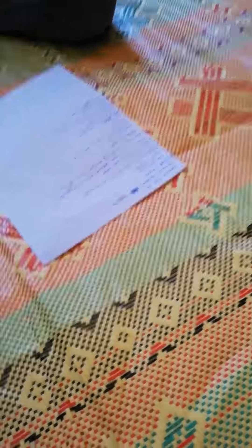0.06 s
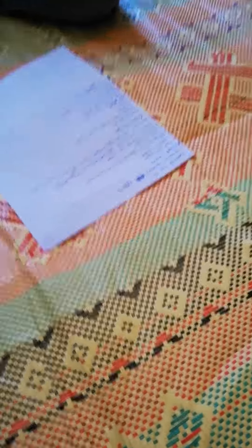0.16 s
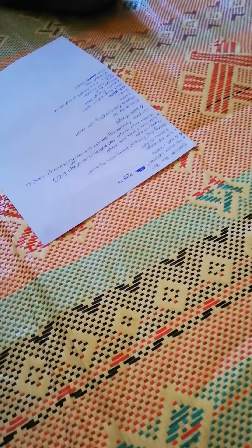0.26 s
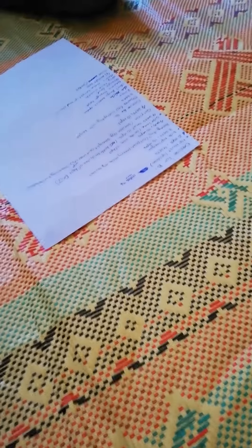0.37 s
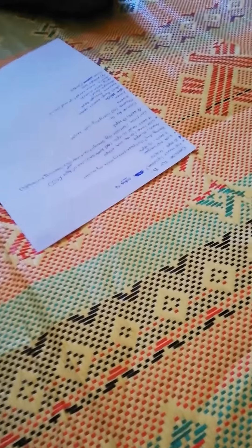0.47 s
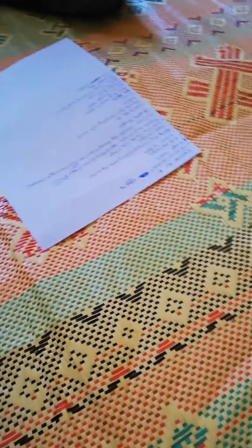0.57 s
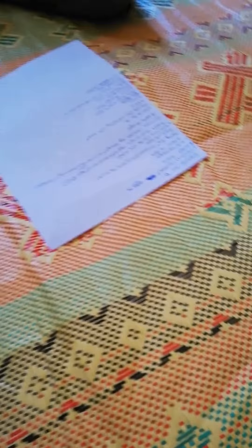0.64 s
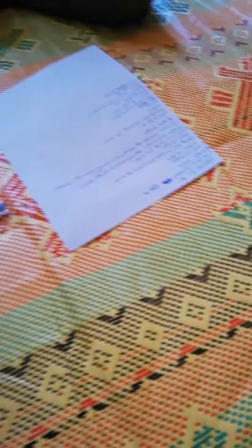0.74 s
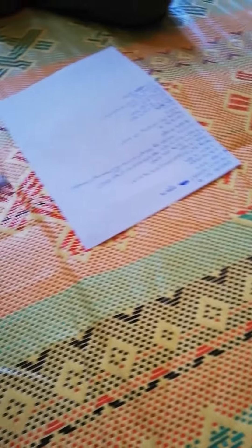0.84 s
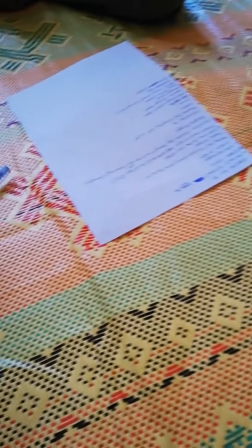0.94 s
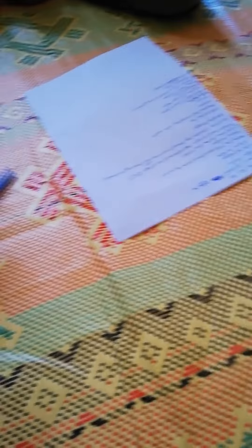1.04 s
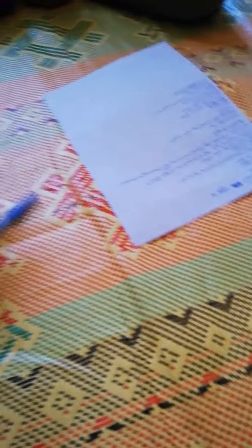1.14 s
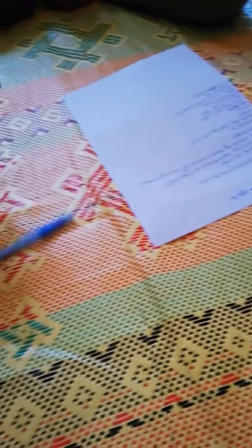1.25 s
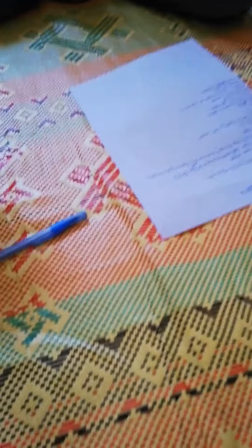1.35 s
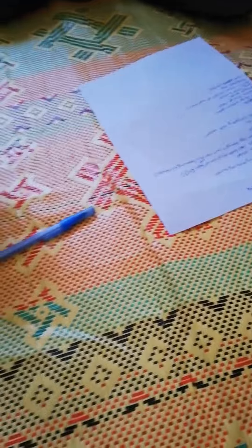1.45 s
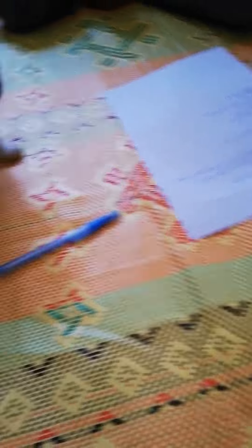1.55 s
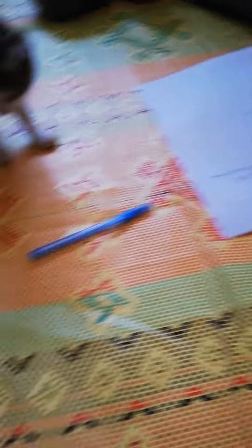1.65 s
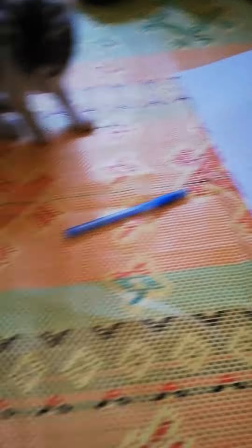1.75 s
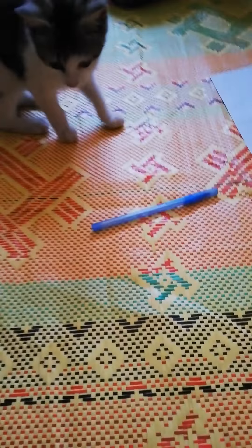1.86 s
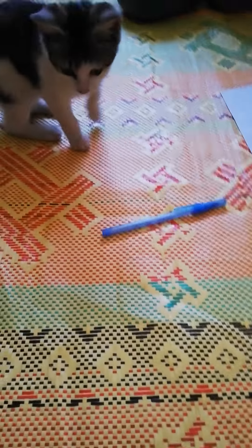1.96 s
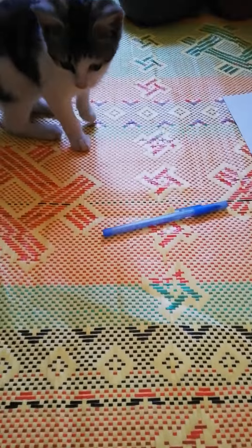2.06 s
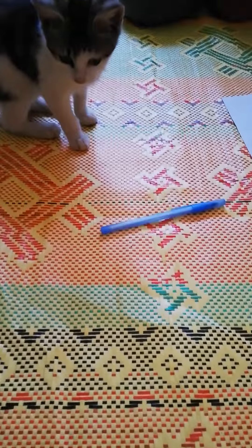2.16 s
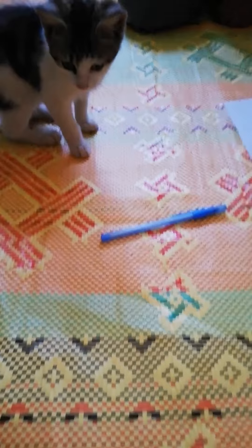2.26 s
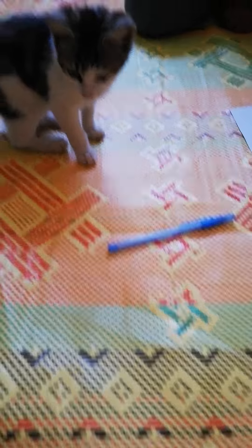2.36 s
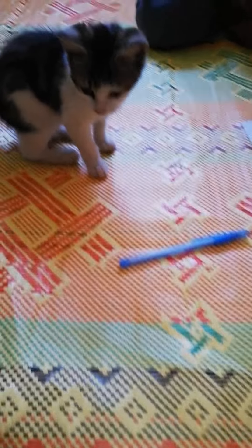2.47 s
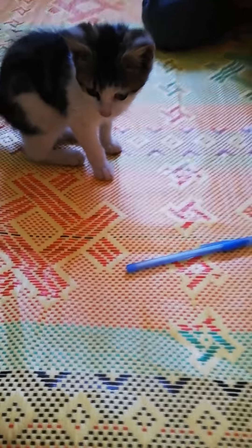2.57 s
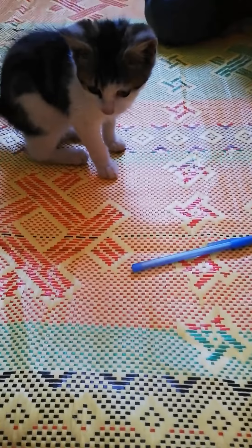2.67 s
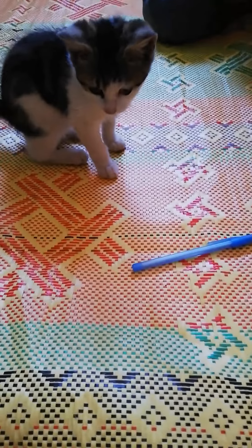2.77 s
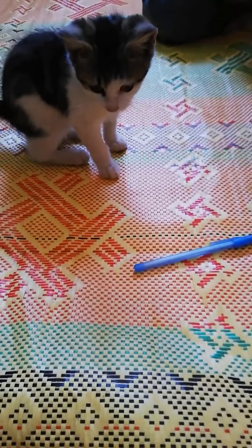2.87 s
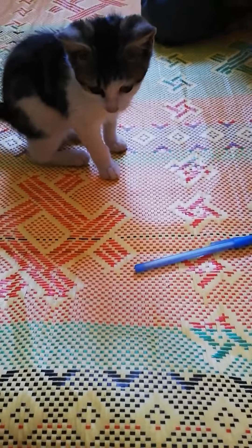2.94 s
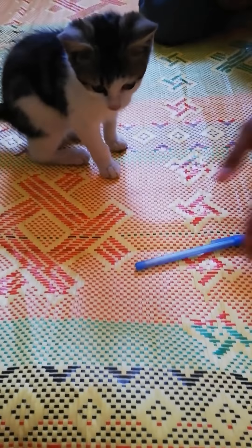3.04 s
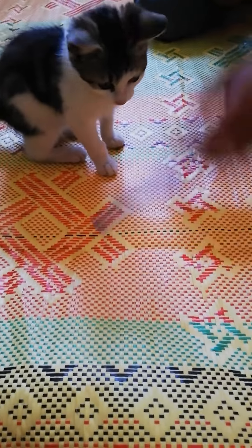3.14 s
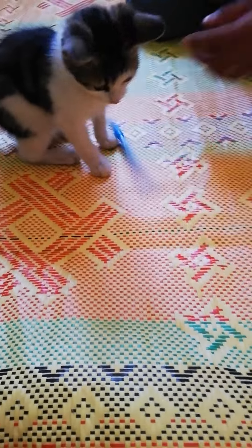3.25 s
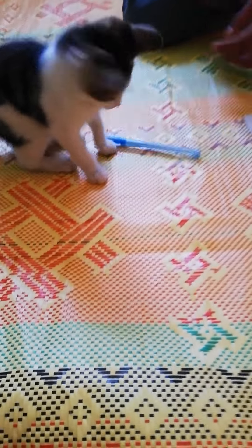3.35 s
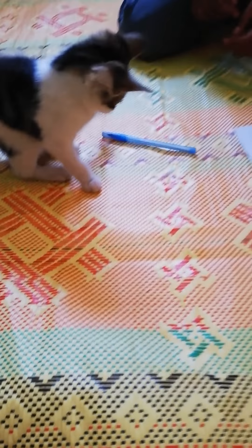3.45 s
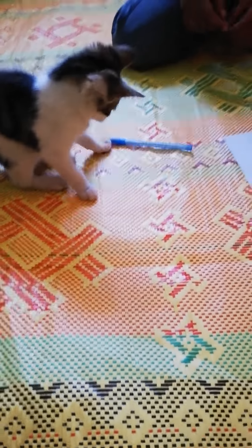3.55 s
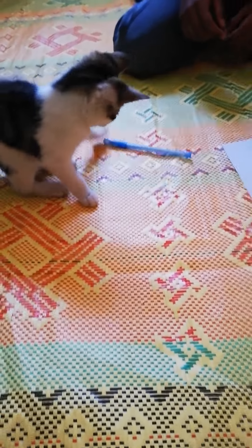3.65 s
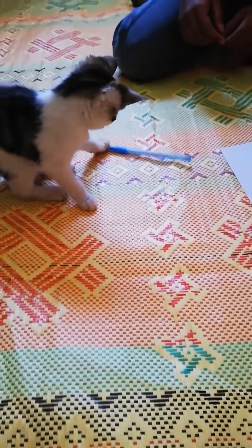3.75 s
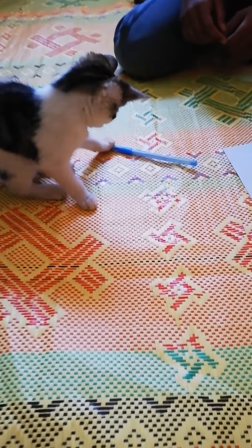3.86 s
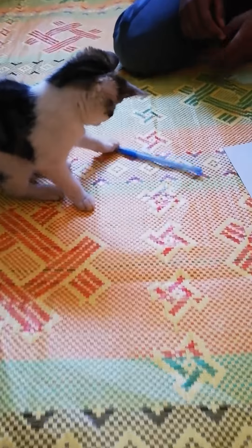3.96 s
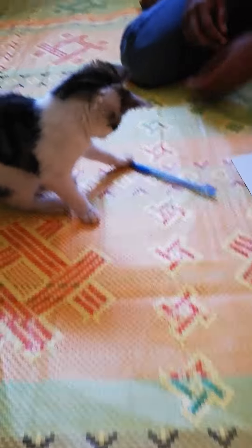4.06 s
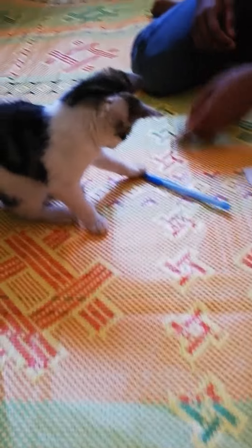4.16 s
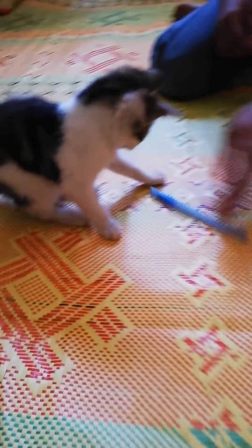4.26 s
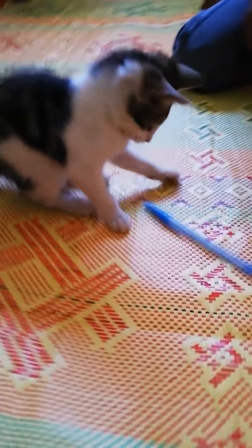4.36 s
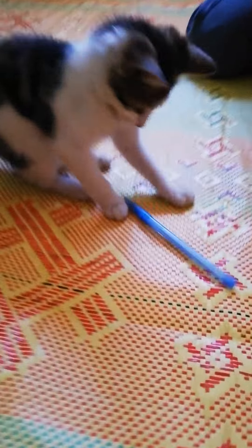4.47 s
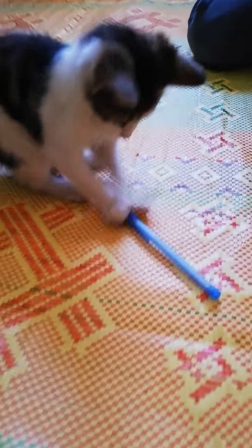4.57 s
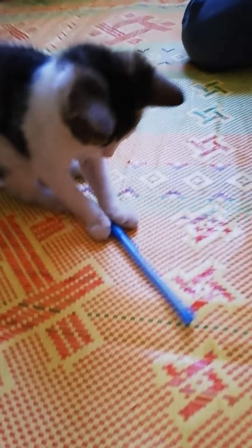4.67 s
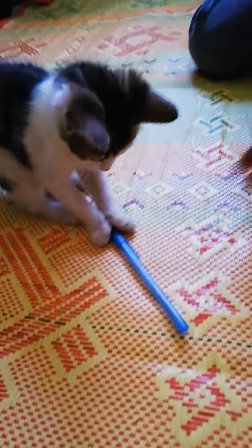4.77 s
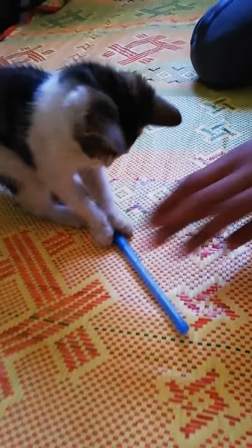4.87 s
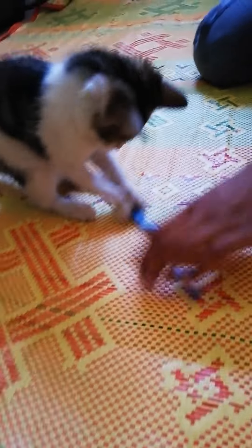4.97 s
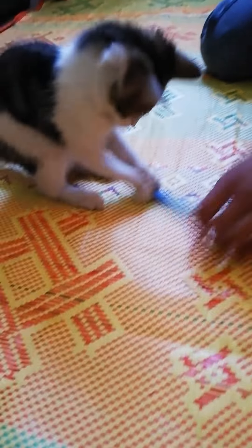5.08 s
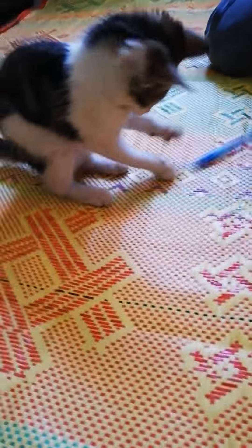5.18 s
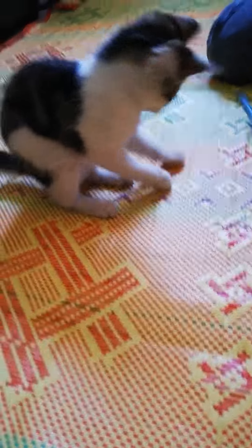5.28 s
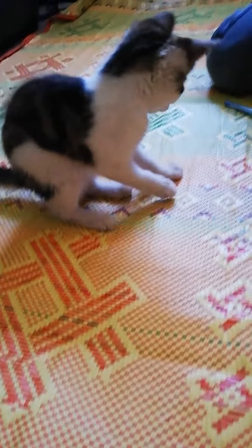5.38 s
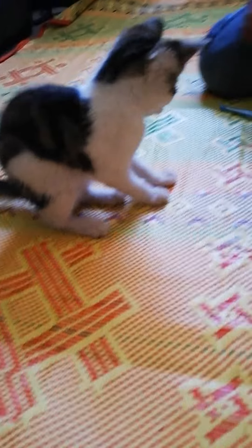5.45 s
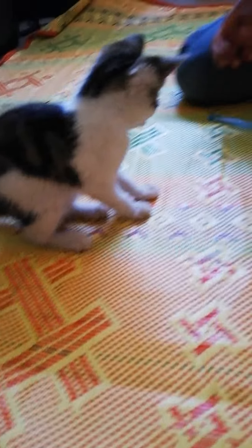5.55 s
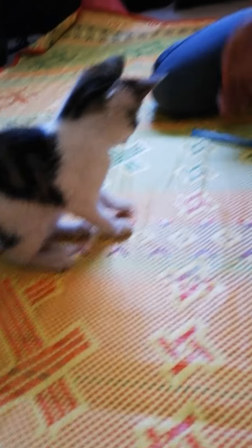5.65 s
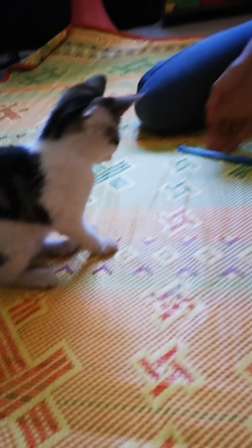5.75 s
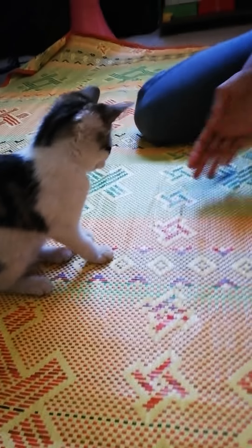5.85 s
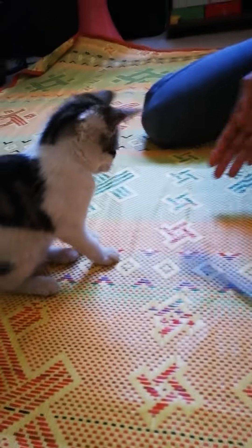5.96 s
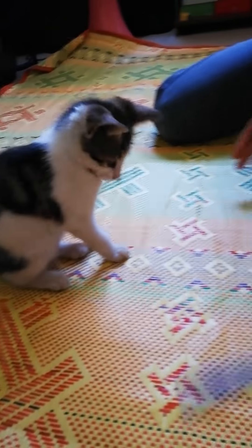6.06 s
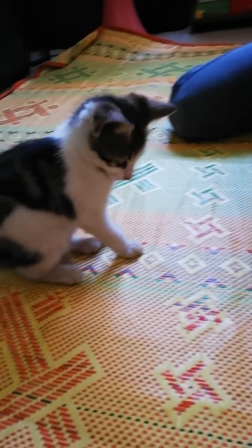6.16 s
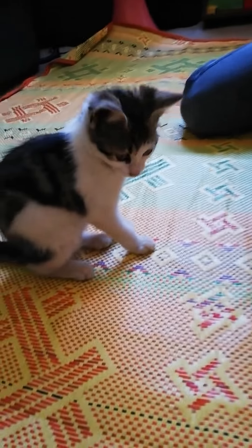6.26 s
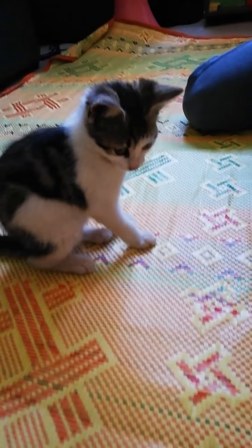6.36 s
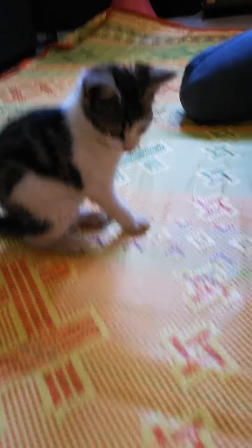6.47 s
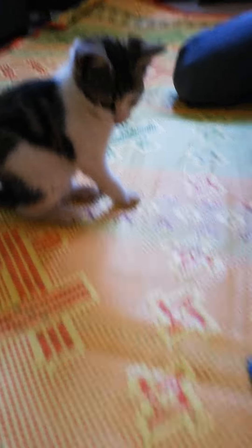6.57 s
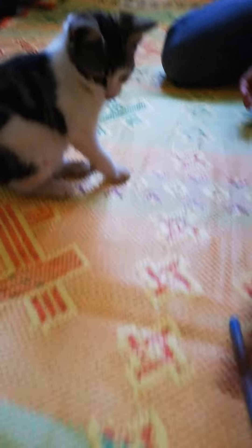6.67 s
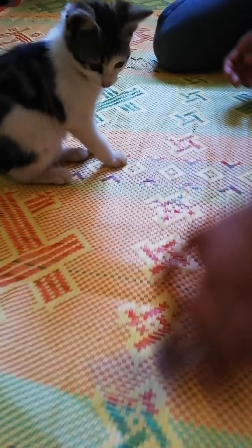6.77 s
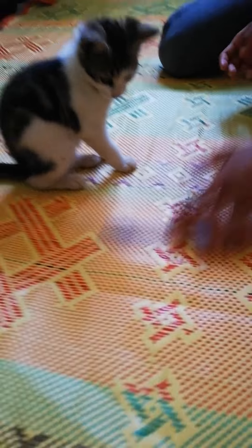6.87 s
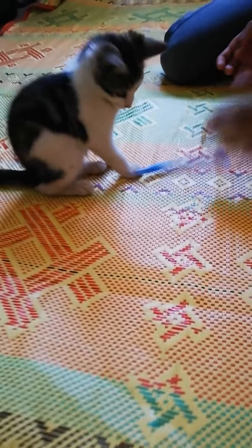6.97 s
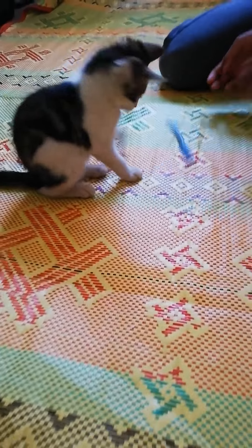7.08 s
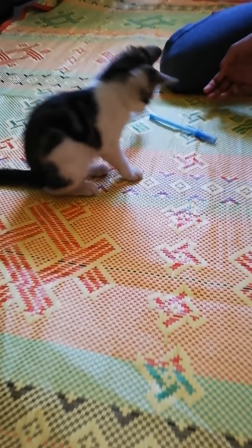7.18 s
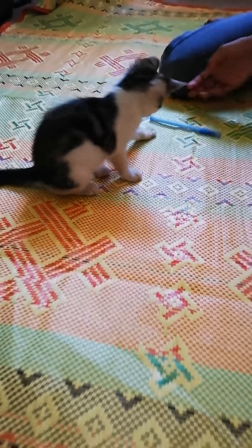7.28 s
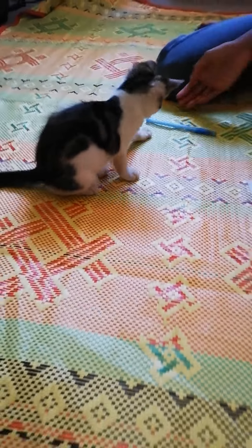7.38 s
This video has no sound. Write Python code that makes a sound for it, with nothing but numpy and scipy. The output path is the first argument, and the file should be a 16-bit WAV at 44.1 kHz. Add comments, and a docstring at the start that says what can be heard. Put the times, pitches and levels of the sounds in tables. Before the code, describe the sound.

A quiet small room, heard close to a woven plastic mat: soft low rumble, faint hiss and weak wavering hums. A barely audible brush at 0.1 s, then crisp claw or pen ticks from 0.75 to 1.0 s, towards the left, and another tight cluster at 1.25 s. A soft scrape follows at 1.5 to 1.9 s. Near quiet, with one tick at 2.55 s. At 3.1 to 3.35 s rough scuffs and clicks, then the loudest sharp snaps at 3.8 to 4.05 s, to the right. A scuff at 4.27 s, a strong scratchy swipe and snap around 4.45 s, thinner rustling, then a duller scrape at 5.05 s and clicks at 5.2 to 5.3 s. A tick at 5.8 s, knocky crackles at 6.0 to 6.3 s, a bright rough rustling burst at 6.7 to 7.0 s, and a final snap at 7.37 s with a faint brush.

```python
"""Friction and snaps on a woven mat

A kitten and a hand push a plastic pen about on a woven plastic floor mat, close to a two-microphone phone.
Friction is a train of random slips: filtered by the strands it hisses and crackles, by the mat's modes it thuds.
Claws and pen snap over single strands: each snap is a filtered tick over a damped sine, the knock of the mat.
Shaped noise gives the small room's rumble and faint hiss, narrow bands of noise its four low drones.
Level and delay between the ports place the play; a resonance near 10 kHz colours each port."""
import sys
import numpy as np
from scipy import signal
from scipy.fft import next_fast_len
from scipy.io import wavfile
from scipy.ndimage import uniform_filter1d

SR = 44100
rng = np.random.default_rng(int(sys.argv[2]) if len(sys.argv) > 2 else 0)


def generate_wav(signal):
    """Clip the signal to [-1, 1] and save it as 16-bit WAV at the path in sys.argv[1]."""
    frames = np.transpose(np.atleast_2d(signal))
    scaled = np.clip(frames, -1, 1) * 32767
    pcm = np.round(scaled).astype(np.int16)
    wavfile.write(sys.argv[1], SR, pcm)


N = 327222  # length in samples

# Spectrum of the room noise ahead of the ports. Each row: frequency in Hz, relative level in dB.
AIR_SPECTRUM = [(25, -2), (50, -3.5), (130, -6), (270, -13), (400, -24), (1000, -20.5), (2500, -29.5),
                (7000, -38), (16000, -45)]
# Correlation of the room noise between the ports. Each row: frequency in Hz, correlation from 0 to 1.
AIR_LIKENESS = [(150, 0.99), (290, 0.78), (600, 0.0077)]
# Four low drones that swell and fade. Each row: time in seconds, then level in dB of each, lowest first.
DRONE_LEVELS = [(0, -68, -65, -58, -66.5), (1.9, -68, -60.5, -58.5, -73.5), (4.3, -72, -67, -73, -83),
                (4.6, -55, -62, -66, -81), (6.3, -54, -62, -77, -92), (6.6, -78, -62.5, -80, -83)]
# The drones' resonances, each applied twice. Each row: centre in Hz, width of one pass in Hz.
DRONE_BANDS = [(59, 6.1), (91.5, 3), (102.5, 7.6), (324, 6.8)]
# Frequency response of a flicked strand. Each row: frequency in Hz, relative gain in dB.
STRAND_RESPONSE = [(1200, -36.5), (2200, -5.5), (4000, -1.5), (6500, -2.5), (13000, -2.5), (16000, -10.5)]
# Modes of the mat. Each row: frequency in Hz, width in Hz, relative level in dB.
MAT_MODES = [(394, 274, -4.5), (800, 605, 0.5), (1073, 484, 3.5), (1590, 420, 0.5), (2780, 2030, -5.5)]
# Place of the play. Each row: time in seconds, left minus right level in dB (treble; the bass gets a share).
PLACE_PATH = [(0, -1.5), (.8, 8.5), (1.8, 2), (2.6, -2.5), (3.3, 9.5), (3.75, -8.5), (4.06, -8.5),
              (4.22, 6.5), (4.4, -4), (5.05, 6.5), (5.3, 10.5), (6, 7), (6.28, 0.5), (6.75, 7.5),
              (7.36, -5.5)]
# Strokes of paw, hand or pen along the weave. Each row: start of full strength in seconds, rise in seconds,
# hold in seconds, fall in seconds, strand hiss in dB, mat body against the hiss in dB.
STROKE_EVENTS = [(0.109, 0.4, 0.013, 0.072, -49, -8), (0.823, 0.091, .01, 0.29, -51, -6),
                 (1.278, 0.14, 0.027, 0.035, -52, 4.5), (1.544, 0.076, 0.35, 0.23, -44, -8.5),
                 (2.304, 0.67, 0.31, 0.71, -56, -5), (3.128, 0.0033, 0.42, 0.54, -52.5, -6.5),
                 (4.22, 0.0055, 0.17, 0.057, -46.5, -7.5), (4.272, 0.07, .01, 0.3, -40, -6.5),
                 (4.44, 0.078, 0.055, 0.045, -33, -7), (4.548, .05, 0.28, 0.054, -52.5, -6),
                 (5.056, 0.032, 0.086, 0.055, -38, -0.5), (5.37, 0.84, 0.013, 0.053, -49.5, -2),
                 (5.393, .2, 0.39, 0.14, -59.5, -10), (5.836, 0.19, 0.0079, 0.063, -49, -9.5),
                 (5.997, 0.0018, .005, 0.21, -41, -3.5), (6.032, 0.016, 0.28, 0.077, -54, 5),
                 (6.78, 0.084, 0.11, 0.16, -36.5, -5), (6.971, 0.049, 0.13, 0.14, -44, -2),
                 (7.42, 0.49, 0.034, 0.074, -55, -2)]
# Rubs that make one patch of the mat sing, its resonance applied twice. Each row: middle in seconds,
# length in seconds, level in dB, pitch in Hz, width of one pass in Hz.
RUB_EVENTS = [(1.488, 0.019, -43.5, 1590, 1100), (4.461, 0.059, -42, 2550, 1900),
              (4.864, 0.37, -62, 1840, 940), (5.098, 0.13, -50, 257, 322), (6.723, 0.071, -46, 1020, 1400),
              (6.795, 0.094, -43, 1220, 600)]
# Short rough scuffs over a few strands. Each row: time of full strength in seconds, length scale in seconds,
# strand crackle in dB, mat body against the crackle in dB.
SCUFF_EVENTS = [(0.85, 0.0057, -31.5, -18), (1.53, 0.072, -50.5, 13.5), (3.157, 0.046, -38, -5.5),
                (3.242, 0.016, -30, -10.5), (3.318, 0.011, -41, -0.5), (3.885, 0.02, -29.5, -6.5),
                (4.274, 0.021, -28.5, -12), (5.046, 0.0064, -36.5, 1), (5.061, 0.014, -34, 3),
                (5.241, 0.02, -38, -10.5), (5.998, 0.0069, -36.5, 2.5), (6.039, 0.02, -43, 3.5),
                (6.069, 0.036, -41, 0.5), (6.173, 0.015, -40, -3.5), (6.818, 0.015, -32, -32),
                (6.849, 0.014, -33, 2), (6.887, 0.034, -32, -2.5), (6.935, 0.022, -27, -15)]
# Snaps of claw or pen over a strand. Each row: start in seconds, level in dB, mat knock against the snap in dB.
SNAP_EVENTS = [(0.7477, -28, -25), (0.8277, -31, -22), (0.84, -22, -34), (0.896, -25, -12),
               (0.911, -28, -32), (.9212, -21.5, -17), (0.9998, -23.5, -17.5), (1.036, -34, -8),
               (1.2425, -29, -5), (1.2546, -24.5, -20), (1.2577, -35, -28), (1.2645, -24, -7.5),
               (1.2707, -21.5, -8), (2.546, -24, -27.5), (3.131, -35, 6), (3.2457, -27, -38),
               (3.311, -34, 0.5), (3.3268, -24, -12), (3.3368, -19, -15.5), (3.811, -40.5, 5.5),
               (3.843, -34, 9), (3.8476, -25.5, -1), (3.85, -28, -4), (3.872, -24, -10), (3.8878, -18, -17),
               (3.891, -23, -8), (3.94, -15, -16), (3.943, -13.5, -9), (3.9936, -17.5, -12.5),
               (4.024, -11.5, -14), (4.0272, -14, -9), (4.3394, -22.5, -8), (4.483, -13, -8),
               (4.6394, -32, 4.5), (5.0294, -35.5, 7.5), (5.0375, -39.5, 11), (5.234, -25, -9),
               (5.319, -16, -21), (5.818, -24.5, -17.5), (6.0062, -20, 3), (6.0613, -22.5, -3),
               (6.164, -33, -23), (6.178, -37.5, 4.5), (6.202, -37, -23), (6.2107, -48, 1),
               (6.2162, -40.5, 13.5), (6.2213, -35.5, 10.5), (6.232, -21, -12), (6.259, -34, 7.5),
               (6.275, -22, -12), (6.277, -33, 6.5), (6.986, -20, -7), (7.366, -18, -10)]
# Middle pitch of the knocks, which depends on the spot. Each row: time in seconds, pitch in Hz.
KNOCK_PITCH = [(1.3, 1770), (4.1, 2250), (4.3, 1090)]

AIR_DB = -53  # rms of the room noise ahead of the ports
PORT_HZ, PORT_WIDTH_HZ = (9850, 10330), 1290  # left and right differ a little
PORT_DB = 8.5  # resonance added to the direct sound
EDGE_HZ = 15740  # upper band limit
LAG_MS_PER_DB, EVEN_DB = .035, 6.5  # both ports hear at once when the left is EVEN_DB louder
WIDEST_LAG_MS = .43  # sound along the line of the two ports
SHADOW_HZ, LOW_SHARE = 980, 0.77  # below this, the phone shadows sound by only this share
SWING_DB = 20  # climb of a stroke over its rise, and drop over its fall
REST_BODY_DB = -82  # mat body between strokes
ECHO_MS = .43  # the floor's quick echo of a snap
KNOCK_T60_S = 0.0045  # time for a knock to die by 60 dB
KNOCK_SCATTER = .2  # widest random shift of a knock's pitch, in natural-log units
THIN_BELOW_DB, THIN_PER_DB = -16.5, 0.75  # the less a snap knocks the mat, the thinner its tick


def gain_of(db):
    """Amplitude is ten to the power of the level over 20."""
    return 10 ** (np.asarray(db) / 20)


def evened(x):
    """Normalisation to unit rms."""
    return x / np.sqrt(np.mean(x ** 2) + 1e-20)


def read_spectrum(points, hz):
    """Interpolation along a logarithmic frequency axis."""
    f, value = np.transpose(points)
    return np.interp(np.log(hz + 1), np.log(f + 1), value)


def curves(rows):
    """Linear interpolation of each column over time."""
    s, *columns = np.transpose(rows)
    return [np.interp(np.arange(N) / SR, s, c) for c in columns]


def resonate(x, hz, width):
    """Two-pole resonance of gain 1 at its centre."""
    return signal.lfilter(*signal.iirpeak(hz, hz / width, SR), x)


def air():
    """Diffuse noise: shaped random spectra with drifting patches, the bass most alike at both ports."""
    frames = N // 512 + 5
    hz = np.fft.rfftfreq(2048, 1 / SR)
    a, b, c, d, patches = rng.standard_normal((frames, 1025, 5)).T
    patches = evened(uniform_filter1d(uniform_filter1d(patches, 12, 0), 12, 1))
    same = np.clip(read_spectrum(AIR_LIKENESS, hz), 0, 1)[:, None]
    left = a + 1j * b
    right = same * left + np.sqrt(1 - same ** 2) * (c + 1j * d)
    spectra = np.array([left, right])
    spectra *= gain_of(read_spectrum(AIR_SPECTRUM, hz)[:, None] + 1.9 * patches)
    noise = signal.istft(spectra, nperseg=2048, noverlap=1536)[1][:, :N]
    return gain_of(AIR_DB) * evened(noise)


def drone():
    """Narrow-band noise with its envelope flattened: tones waver more in pitch than in level."""
    noise = rng.standard_normal((len(DRONE_BANDS), N))
    total = 0
    for (hz, width), v, db in zip(DRONE_BANDS, noise, curves(DRONE_LEVELS)):
        band = resonate(resonate(v, hz, width), hz, width)
        envelope = abs(signal.hilbert(band, next_fast_len(N))[:N])
        total = total + gain_of(db) * evened(band / np.sqrt(envelope + 1e-12))
    return total  # one signal, the same at both ports


def room(x, t60=0.29):
    """Reverberation: a decaying tail of sparse reflections, different at each port."""
    t = np.arange(SR // 3) / SR
    taps = rng.choice([-1., 1.], (2, len(t))) * (rng.random((2, len(t))) < .1)
    taps = taps * gain_of(-60 * t / t60) * (t > .004)
    return signal.fftconvolve(x, taps / np.linalg.norm(taps[0]), axes=1)[:, :N]


def ports(x):
    """Cavity resonance: the air in each microphone port lifts a band of treble."""
    return np.array([v + gain_of(PORT_DB) * resonate(v, hz, PORT_WIDTH_HZ) for v, hz in zip(x, PORT_HZ)])


def through(x, taps, order):
    """Convolution with a response scaled, after the left port, to unit rms gain (order 2) or peak (inf)."""
    return signal.oaconvolve(x, taps[None] / np.linalg.norm(ports([taps])[0], order), axes=1)[:, :N]


def placed(x):
    """Binaural cues: level and arrival at the two ports follow the place of the play."""
    side_db = curves(PLACE_PATH)[0]
    # the left port hears later unless it is more than EVEN_DB louder
    lag_ms = np.clip(LAG_MS_PER_DB * (EVEN_DB - side_db), -WIDEST_LAG_MS, WIDEST_LAG_MS)
    lag = lag_ms * SR / 1000
    late = np.round(np.maximum([lag, -lag], 0)).astype(int)
    x = np.take_along_axis(x, np.maximum(np.arange(N) - late, 0), axis=1)
    low = signal.sosfiltfilt(signal.butter(2, SHADOW_HZ, fs=SR, output="sos"), x)
    half_db = np.array([side_db / 2, -side_db / 2])
    return low * gain_of(LOW_SHARE * half_db) + (x - low) * gain_of(half_db)


def patchy(x, patchy_db):
    """Varying contact: the touch wanders over other strands, so bands of the colour come and go."""
    z = signal.stft(x, nperseg=256)[2]
    patches = rng.standard_normal(z.shape[1:])
    for _ in range(2):
        patches = uniform_filter1d(uniform_filter1d(patches, size=9, axis=0), size=15, axis=1)
    return signal.istft(z * gain_of(patchy_db * evened(patches)), nperseg=256)[1][:, :N]


def pressed(x, body_db):
    """Damping: a heavy touch, with much mat body against the hiss, dulls the top; a light one frees it."""
    top = signal.sosfiltfilt(signal.butter(4, 12000, "high", fs=SR, output="sos"), x)
    top_db = -.6 * np.clip(body_db + 11.5, -10, 10)
    return x + top * (gain_of(top_db) - 1)


def strand():
    """Minimum phase: the causal response of a flicked strand, found from its gain alone."""
    hz = abs(np.fft.fftfreq(2048, 1 / SR))
    log_gain = np.log(gain_of(read_spectrum(STRAND_RESPONSE, hz)))
    return np.fft.ifft(np.conj(np.exp(signal.hilbert(log_gain)))).real[:512]


def mat():
    """Modal sum: the mat's broad, quickly damped modes, alternating in sign."""
    pulse = np.eye(1, 2000)[0]
    return sum((-1) ** k * gain_of(db) * resonate(pulse, hz, width)
               for k, (hz, width, db) in enumerate(MAT_MODES))


def slips(per_s, spread_db, clump_db, clump_s, shared):
    """Stick-slip: tiny random slips of uneven, clumped size; each port hears partly its own."""
    width = int(clump_s * SR)
    clumps = evened(uniform_filter1d(uniform_filter1d(rng.standard_normal(N), width), width))
    size = gain_of(spread_db * np.minimum(rng.exponential(1, (3, N)), 3) + clump_db * clumps)
    train = size * np.sign(rng.standard_normal((3, N))) * (rng.random((3, N)) < per_s / SR)
    return evened(train[:2] + shared * train[2])


def strokes():
    """Addition of powers: hiss and body levels in dB of strokes that each rise, hold and fall."""
    t = np.arange(0, N + 64, 64) / SR
    s, rise, hold, fall, db, body_db = np.transpose(STROKE_EVENTS)[:, :, None]
    away = np.maximum((s - t) / abs(rise), (t - s - abs(hold)) / abs(fall))
    level_db = db - SWING_DB * np.maximum(away, 0)
    hiss = (gain_of(level_db) ** 2).sum(0) + 1e-20
    body = (gain_of(level_db + body_db) ** 2).sum(0) + gain_of(REST_BODY_DB) ** 2
    return [np.interp(np.arange(N) / SR, t, 10 * np.log10(p)) for p in (hiss, body)]


def rubbing():
    """Sliding friction: fine slips hiss in the strands; coarser ones shake the mat."""
    hiss_db, body_db = strokes()
    fine = slips(7000, 3.7, 1.5, 0.0052, 0.083)
    coarse = slips(3000, 4.0, 2.8, 0.0079, 0.3)
    hiss = through(fine * gain_of(hiss_db), strand(), order=2)
    body = through(coarse * gain_of(body_db), mat(), order=2)
    return hiss + body


def rubs():
    """Resonance under friction: clumped slips in a smooth swell ring at each patch's own pitch."""
    t = np.arange(N) / SR
    grain = slips(1500, 2.1, 2.9, 0.0048, 1.7)
    total = 0
    for s, length, db, hz, width in RUB_EVENTS:
        ringing = evened(resonate(resonate(grain, hz, width), hz, width))
        swell = np.exp(-(2 * (t - s) / length) ** 4)
        total = total + gain_of(db) * ringing * swell
    return total


def scuffs():
    """Rough friction: each scuff is a brief swell of coarse slips in strands and mat."""
    t, crackle, body = np.arange(N) / SR, np.zeros(N), np.zeros(N)
    for s, length, db, body_db in SCUFF_EVENTS:
        u = (t - s) / length
        steepness = np.where(u < 0, (u / .5) ** 8, (u / 0.26) ** 2)  # abrupt onset, gentler fall
        swell = gain_of(db) * np.exp(-np.minimum(steepness, 30))
        crackle = crackle + swell
        body = body + swell * gain_of(body_db)
    coarse = slips(2500, 3.2, 2, 0.0015, 1.26)
    return through(coarse * crackle, strand(), order=2) + through(coarse * body, mat(), order=2)


def snaps():
    """Impulse excitation: a sharp tick with a short rattle, over a damped sine as the mat is pushed down."""
    ticks, knocks = np.zeros((2, 2, N + 500))
    echo = round(ECHO_MS * SR / 1000)
    t = np.arange(400) / SR
    fade = 0.065 * gain_of(-60 * t / 0.011)
    noise = rng.standard_normal((len(SNAP_EVENTS), 3, 400))
    for (s, db, knock_db), (both, left, right) in zip(SNAP_EVENTS, noise):
        rattle = (2 * both + np.array([left, right])) * fade
        rattle[:, 0] = -1  # the tick itself
        rattle[:, echo:] += 0.27 * rattle[:, :-echo]
        thinning = np.clip(THIN_PER_DB * (THIN_BELOW_DB - knock_db), 0, 2) / 2
        for _ in range(2):
            rattle[:, 1:] -= thinning * rattle[:, :-1]  # differencing weakens the bass
        # no two knocks land on quite the same pitch
        knock_hz = np.interp(s, *np.transpose(KNOCK_PITCH)) * np.exp(KNOCK_SCATTER * np.tanh(both[0]))
        knock = gain_of(-60 * t / KNOCK_T60_S) * np.sin(2 * np.pi * knock_hz * t + 1)
        at = round(s * SR)
        ticks[:, at:at + 400] += rattle * gain_of(db)
        knocks[:, at:at + 400] -= knock * gain_of(db + knock_db)
    return through(ticks, strand(), order=np.inf) + knocks[:, :N]


def scene():
    """Superposition: background noise and drones, the rubbing, and the snaps and scuffs with their tail."""
    hiss_db, body_db = strokes()
    background = air() + drone()
    friction = placed(patchy(rubbing(), 1.3) + rubs())
    near = placed(snaps() + patchy(scuffs(), 1.0))
    play = near + gain_of(-10.5) * room(near) + friction
    return pressed(play, body_db - hiss_db) + background


def record(dry):
    """Linear filtering: port resonance, then the band limit."""
    band_limit = signal.firwin(511, EDGE_HZ, window=("kaiser", 9), fs=SR)
    return signal.oaconvolve(ports(dry), band_limit[None], "same")


dry = scene()
out = record(dry)
generate_wav(out)
```